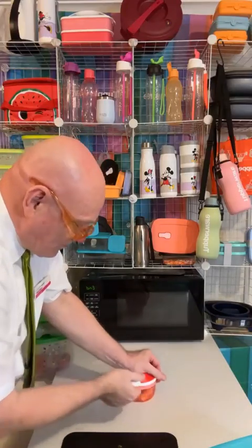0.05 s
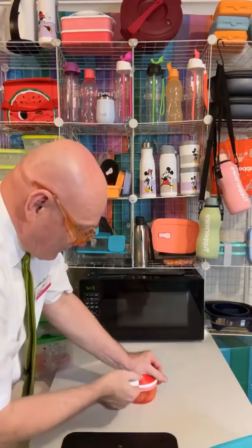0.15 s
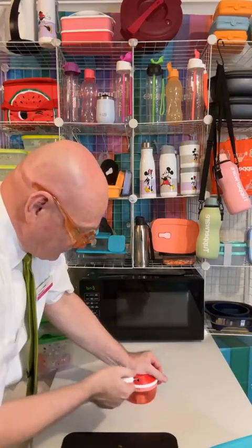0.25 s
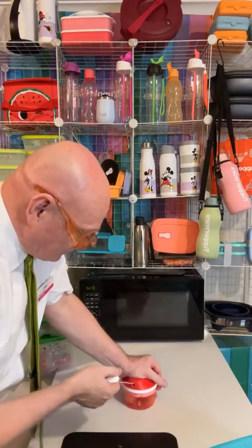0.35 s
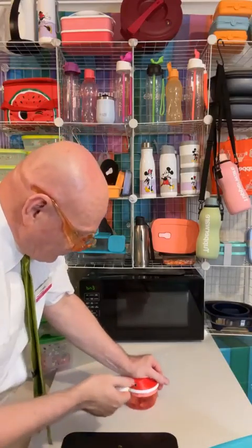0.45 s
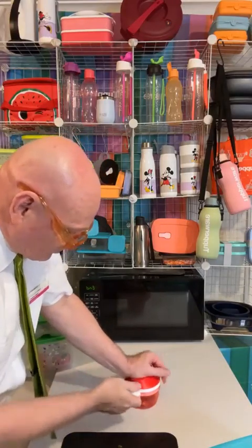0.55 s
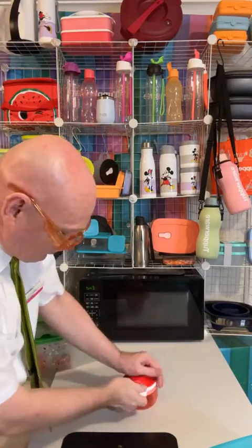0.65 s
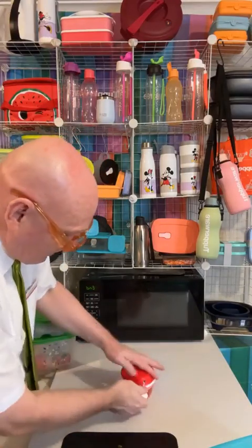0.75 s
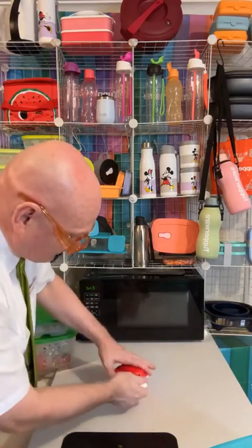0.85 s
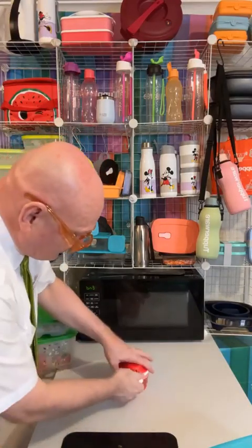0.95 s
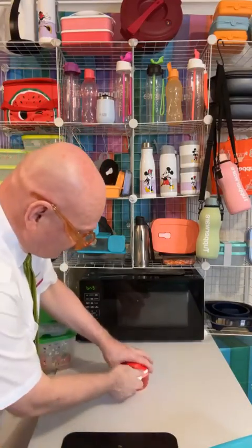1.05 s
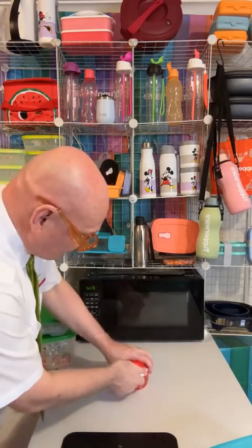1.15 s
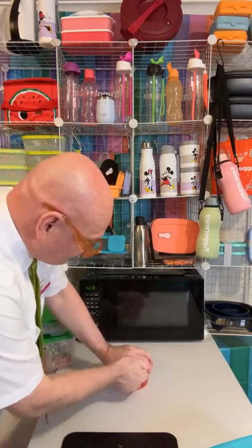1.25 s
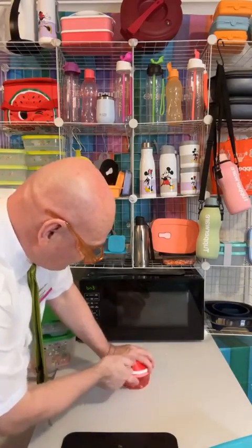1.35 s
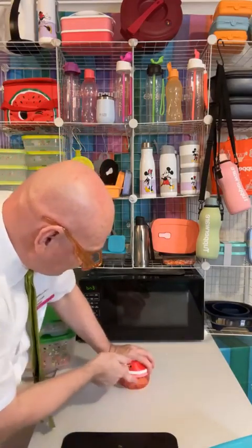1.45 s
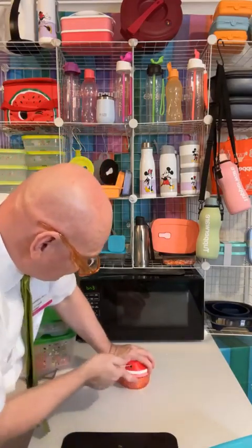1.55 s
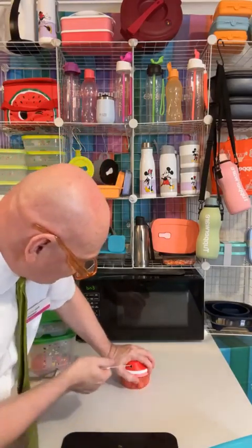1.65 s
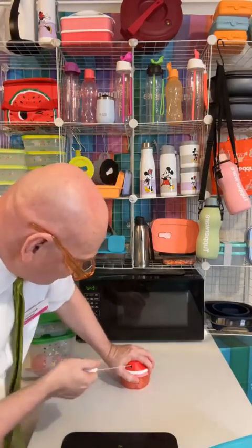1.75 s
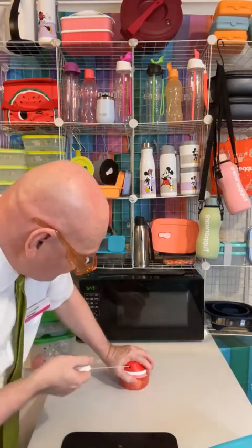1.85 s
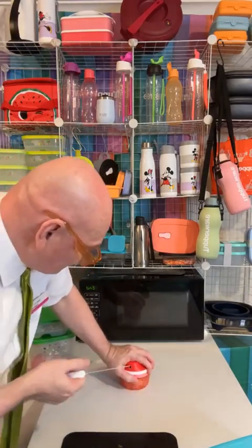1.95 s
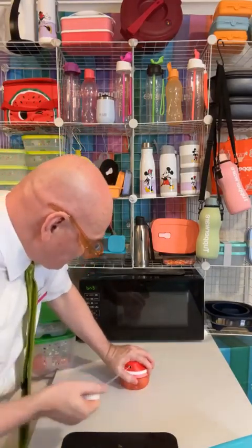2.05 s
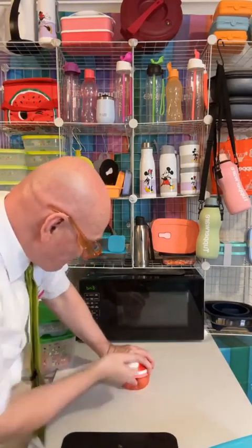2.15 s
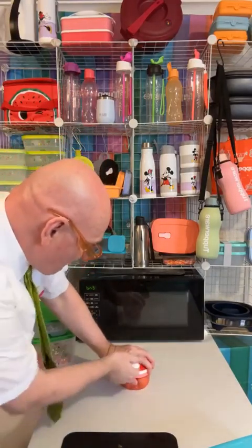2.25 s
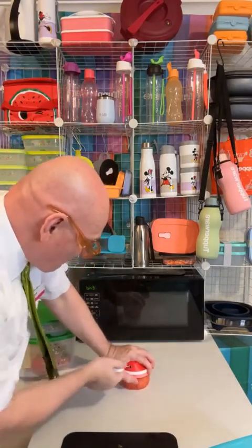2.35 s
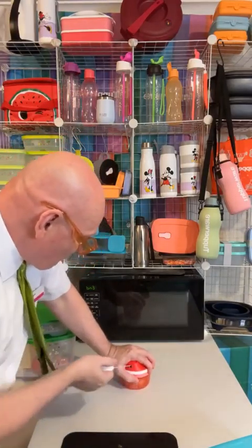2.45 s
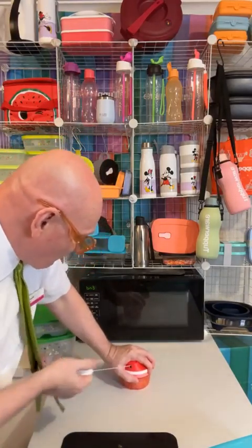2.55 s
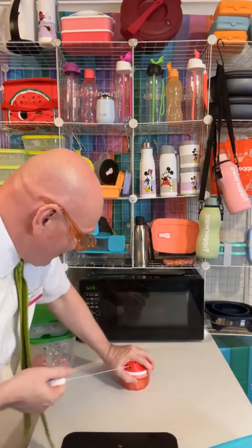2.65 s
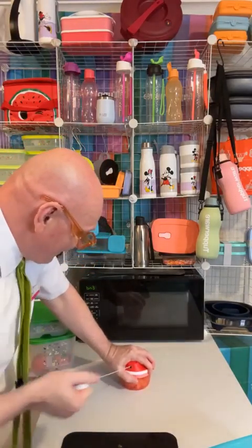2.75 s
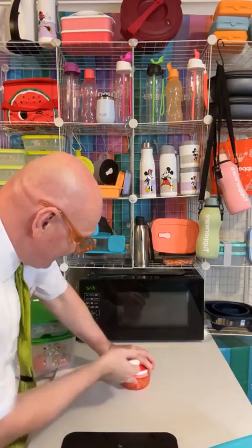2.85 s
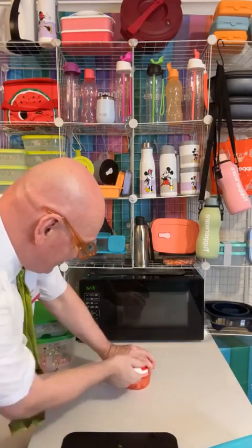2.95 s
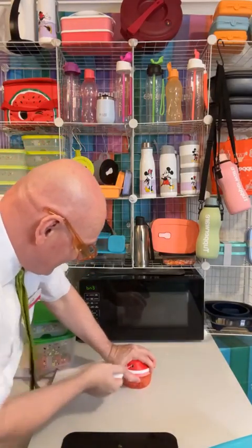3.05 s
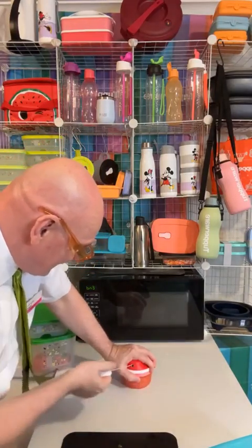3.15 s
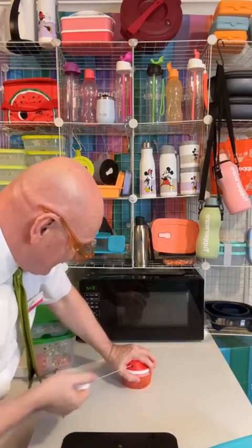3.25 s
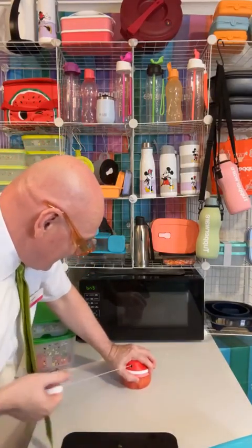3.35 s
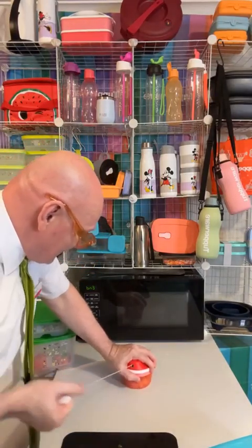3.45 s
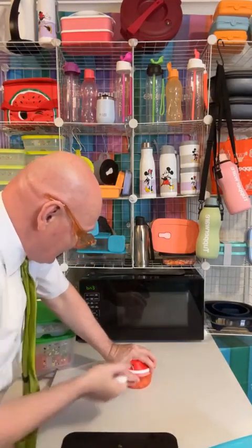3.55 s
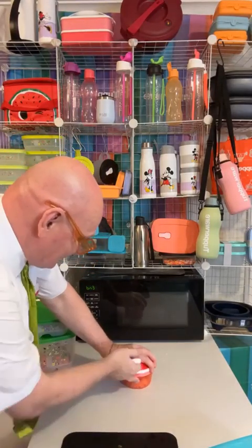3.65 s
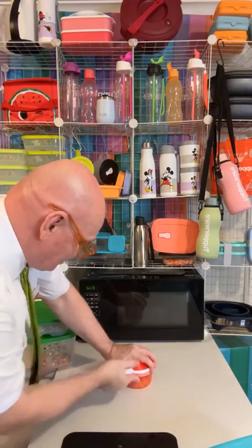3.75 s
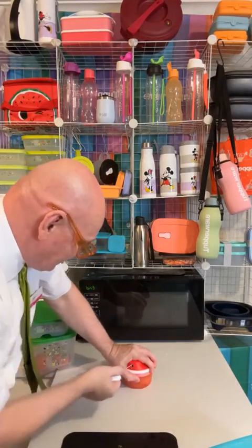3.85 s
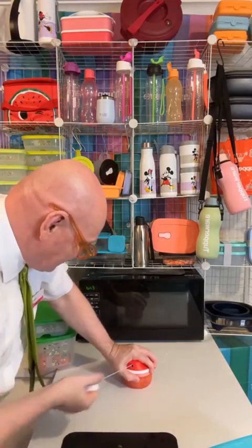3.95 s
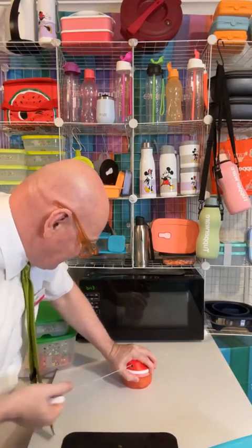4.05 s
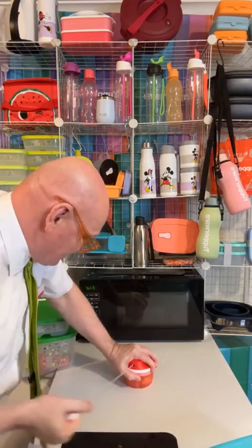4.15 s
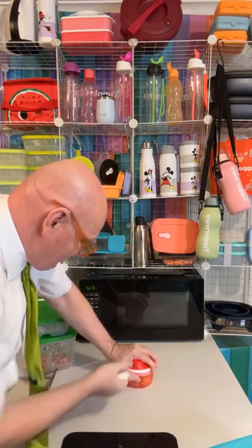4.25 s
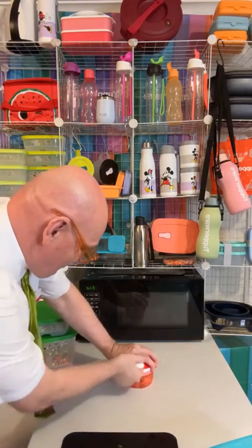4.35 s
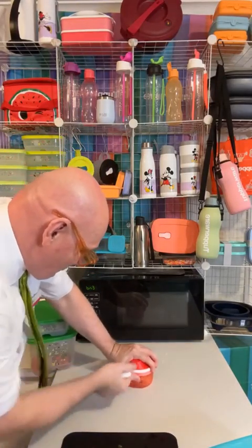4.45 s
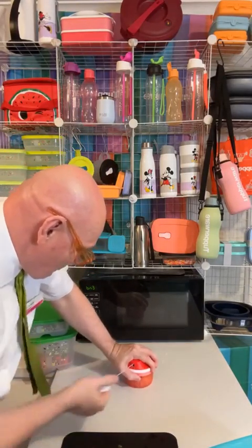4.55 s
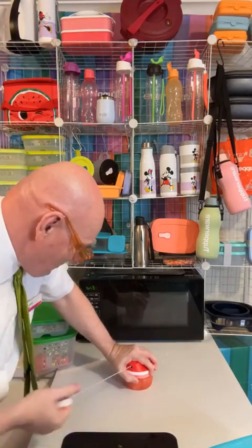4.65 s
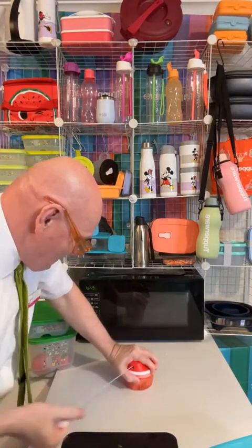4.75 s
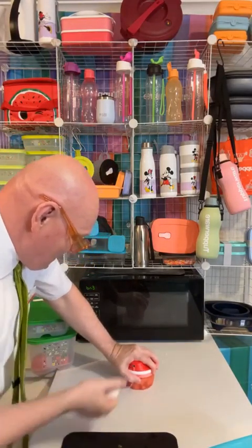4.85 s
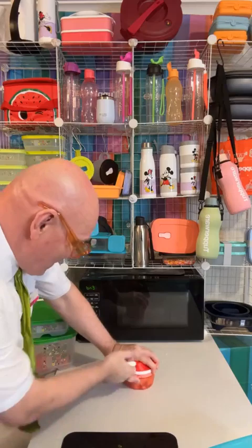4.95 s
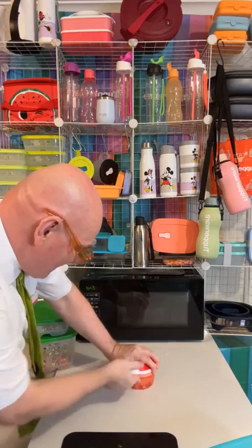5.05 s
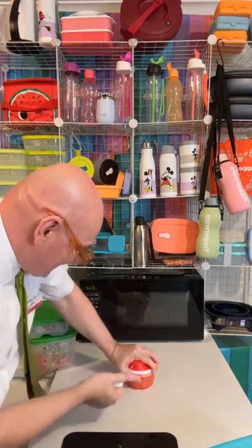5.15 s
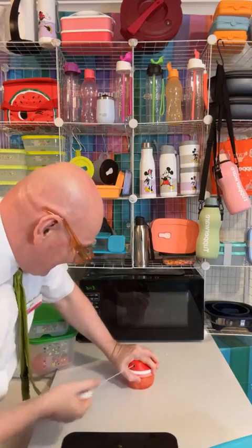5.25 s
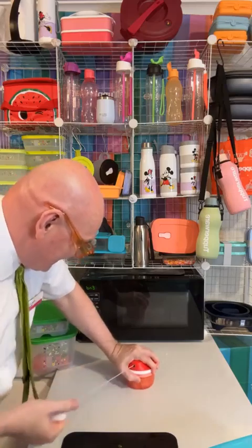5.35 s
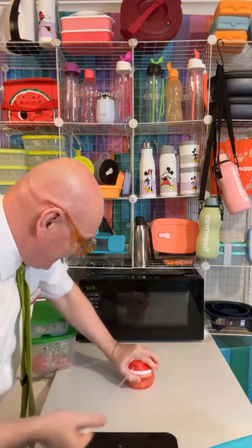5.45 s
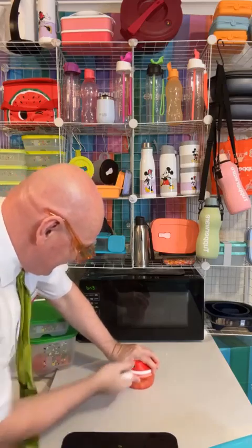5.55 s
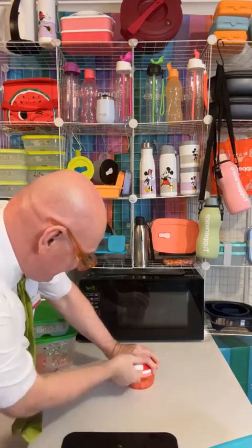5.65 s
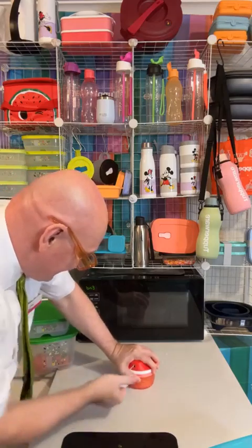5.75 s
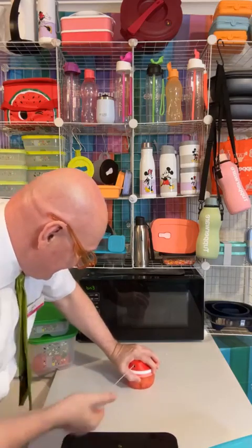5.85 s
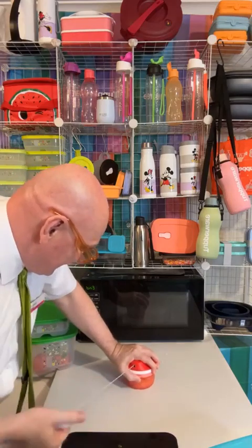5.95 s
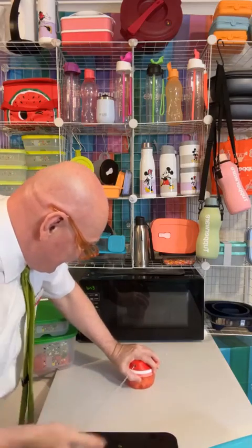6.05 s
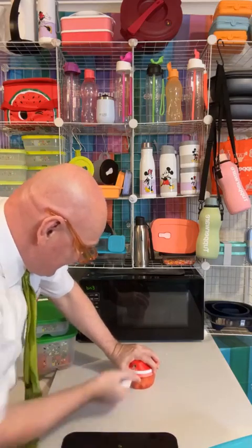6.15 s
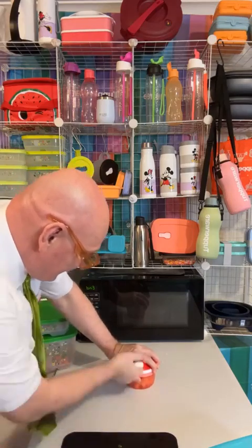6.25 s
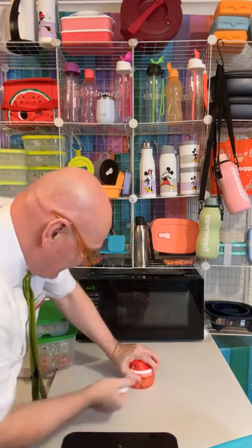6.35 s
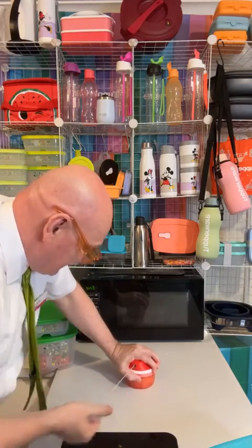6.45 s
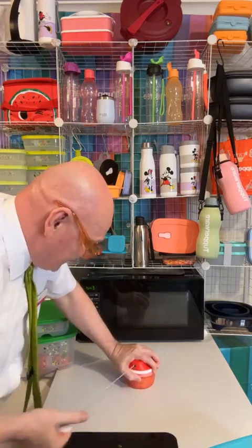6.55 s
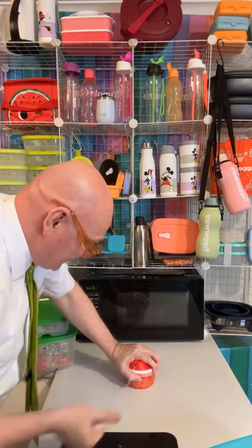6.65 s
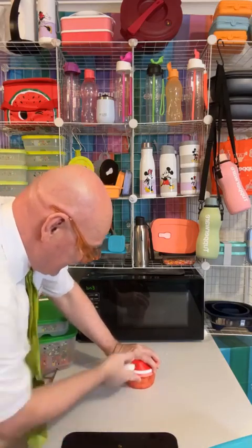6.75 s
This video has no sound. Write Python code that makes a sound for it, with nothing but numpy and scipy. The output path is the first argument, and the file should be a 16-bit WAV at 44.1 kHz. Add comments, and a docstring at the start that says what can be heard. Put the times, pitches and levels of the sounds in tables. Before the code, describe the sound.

In a small, cluttered kitchen, a plastic pull-cord chopper is slid and bumped on the counter with faint rubs and taps. The cord then jams through two short tugs before full pulls begin. Each sends blades clattering through hard pieces with low counter rumble, followed by a bright ratcheting rewind and a click. Fairly close microphone, short room echoes, quiet noise floor.

```python
"""Blades of a pull-cord chopper batter hard food round a plastic bowl: random blows on wall resonances.
Eight pulls, the first jamming into two tugs, rumble the kitchen counter; a low whir follows the blades.
Between pulls a spring winds the cord back: pawl ticks make a bright whirr, and the catch clicks in.
Before that a hand slides and bumps the chopper into place: filtered slips and short noise bursts.
Kitchen echoes surround it all, over a quiet noise floor."""
import sys
import numpy as np
from scipy import signal
from scipy.fft import rfft, irfft
from scipy.io import wavfile
from scipy.ndimage import uniform_filter1d

SR = 44100
rng = np.random.default_rng(int(sys.argv[2]) if len(sys.argv) > 2 else 0)


def store_wav(level_fs):
    """Save 16-bit WAV to argv[1]."""
    pcm = np.round(np.clip(np.atleast_2d(level_fs), -1, 1) * 32767)
    wavfile.write(sys.argv[1], SR, pcm.T.astype(np.int16))


N = 299306
TIME = np.arange(N) / SR

# Drives in the tables are levels ahead of filters and mix gains; spectra are relative.
# spring rewinds: start t/s, catch t/s, speed-up/s, ratchet drive/dB, release drive/dB, catch drive/dB
REWINDS = [(2.368, 2.593, 0.069, -27, -22, -18), (3.078, 3.282, 0.06, -24, -23, -19),
           (3.799, 4.027, 0.081, -25, -46, -17.5), (4.482, 4.691, 0.099, -24, -36, -23),
           (5.119, 5.342, 0.067, -23.5, -27.5, -20), (5.761, 5.976, 0.062, -23.5, -30, -22.5),
           (6.372, 6.586, 0.09, -24.5, -31.5, -20.5)]
# bowl resonances, with dips where the counter's reflection cancels (near 200 and 455 Hz): f/Hz, width/Hz,
# lift/dB
BOWL_MODES = [(200, 26, -11), (262, 93, 14), (384, 61, 5), (455, 31, -3.5), (542, 63, 3), (808, 7.8, 6.5),
              (970, 18, -0.5), (1580, 20, 8), (1506, 74, 4), (2097, 30, 6.5), (3230, 90, -22),
              (3290, 52, 12), (3540, 90, -13), (4440, 640, 7), (5300, 130, 6), (7550, 130, 7)]
# counter-top resonances: f/Hz, width/Hz, lift/dB
COUNTER_MODES = [(81.3, 13.6, 9.5), (114, 9.6, 17.5), (150, 28, 4)]
# resonances of the lid that houses the reel: f/Hz, width/Hz, lift/dB
LID_MODES = [(285, 25, 6.5), (364.7, 17, 8.5), (800, 13, 9.5), (1040, 360, 6), (1497, 100, 5),
             (1727, 76, 6.5), (2200, 81, 7), (2777, 160, 3), (2980, 210, 6.5), (4000, 220, 3),
             (5070, 160, 5), (5360, 44, 1), (7000, 100, 7)]
# counter rumble spectrum: f/Hz, level/dB
RUMBLE_SPECTRUM = [(25, -36), (45, -56), (66, -15), (82, -5), (120, -10), (170, 1.5), (230, -5.5),
                   (400, -5), (1500, -73)]
# spectrum of cord hiss, food cracks and lid ticks: f/Hz, level/dB
HISS_SPECTRUM = [(1500, -33.5), (3500, 13.5), (5000, 4.5), (7000, -3.5), (9000, -8), (13000, -19),
                 (16000, -9)]
# treble spectrum of rewinding cord and contact snaps: f/Hz, level/dB
ZIP_SPECTRUM = [(3000, -29), (6000, 6), (7500, 3.5), (9500, -3), (11500, 1), (14000, -1), (16000, -6.5)]


def chopping(idle_hz=85, top_hz=155, coast_s=.12):
    """Spinning blades fling pieces at the bowl wall; the blows shake the counter while the cord runs out."""
    # chopping spectrum: f/Hz, level/dB
    chop_spectrum = [(120, -25), (250, -15), (450, -3.5), (700, -1), (1000, 3), (1500, -3), (2500, -7),
                     (4500, -16), (6000, -19.5), (9000, -30.5), (16000, -31)]
    chop, rumble = pull_gains()
    blows = contacts(per_s=170, spread_db=0.0)

    clatter = even(crunch(blows, crush_s=.0018, bed=.35), window_s=.028)
    bowl = colour(chop * clatter, chop_spectrum, BOWL_MODES)

    small_blows = contacts(per_s=740, spread_db=2)
    patter = chop * even(pieces(blows + 0.24 * small_blows, q=9.8), window_s=0.022)

    shaking = colour(crunch(blows, crush_s=0.0025, bed=0.15), RUMBLE_SPECTRUM, COUNTER_MODES)
    counter = rumble * even(shaking, window_s=0.19)

    friction = even(crunch(blows, crush_s=0.0024, bed=0.85), window_s=.04)
    cord = colour(chop ** 0.95 * friction, HISS_SPECTRUM)

    # the rotor speeds up with the pull and coasts down: a low, unsteady whir
    momentum = np.sqrt(leak(chop, coast_s))
    speed = momentum / momentum.max()
    pass_hz = idle_hz + (top_hz - idle_hz) * speed + 12 * drift(per_s=60)
    tone = np.sin(2 * np.pi * np.cumsum(pass_hz) / SR)
    whir = rumble * speed * tone * from_db(5.6 * drift(per_s=31))

    return (bowl + from_db(-8) * patter + from_db(-4.5) * counter
            + from_db(-23.0) * cord + from_db(-9.5) * whir)


def pull_gains():
    """Each pull speeds the blades up and lets them run down: gains of chopping and counter rumble."""
    # cord pulls: start t/s, speed-up/s, run-down/s,
    # first-bite chop drive/dB, full-speed chop drive/dB, counter rumble drive/dB
    pulls = [(1.815, 0.039, 0.47, -38.5, -33.5, -33), (2.171, 0.071, 0.122, -45, -35, -37),
             (2.678, 0.21, 0.16, -36.5, -23, -32), (3.34, 0.23, 0.19, -36, -26, -32),
             (4.086, 0.26, 0.11, -35.5, -23, -34), (4.739, 0.084, 0.27, -35.5, -22.5, -33.5),
             (5.395, 0.1057, 0.23, -34, -23, -35), (6.03, 0.12, 0.21, -29, -22, -37.5),
             (6.633, 0.11, 0.27, -28, -23, -36)]
    bends = (1.1, 1.4)
    chop, rumble = 0, 0
    for start_s, rise_s, fall_s, bite_db, top_db, rumble_db in pulls:
        chop_swell = swell(start_s, rise_s, fall_s, rise_db=top_db - bite_db, fall_db=22,
                           bends=bends, fade_s=0.0159)
        # the rumble swings less than the chopping
        rumble_swell = swell(start_s, rise_s, fall_s, rise_db=3, fall_db=19,
                             bends=bends, fade_s=0.0069)
        chop = chop + from_db(top_db) * chop_swell
        rumble = rumble + from_db(rumble_db) * rumble_swell
    return chop, rumble


def knocks():
    """Blades strike big pieces: blows ring the bowl, each at its own pitch, thump the counter, crack food."""
    # big-piece blows: t/s, force drive/dB, ring f/Hz, crack drive/dB
    strikes = [(1.886, -22, 1165, -54), (1.945, -24.5, 1040, -49), (1.975, -20, 920, -32),
               (1.979, -5.5, 1410, -23), (2.142, -23, 714, -44), (2.187, -15.5, 970, -35),
               (2.231, -11, 1086, -35), (2.267, -19, 800, -52), (2.678, -13.5, 1540, -30),
               (2.825, -9, 1220, -25), (2.905, -9, 1180, -31), (2.968, -18, 1040, -32),
               (3.339, -17, 854, -39), (3.369, -15.5, 1110, -36), (3.389, -26, 527, -38.5),
               (3.463, -16, 980, -33), (3.516, -10.5, 1100, -39), (3.538, -10.5, 1070, -31),
               (3.582, -11, 910, -31), (3.607, -16, 1073, -45), (4.217, -29, 1040, -36.5),
               (4.25, -12, 742, -27.5), (4.286, -10, 1000, -32), (4.329, -12, 776, -38),
               (4.415, -17, 1630, -33), (4.762, -20, 840, -39), (4.826, -13.5, 1560, -32),
               (4.877, -9.5, 1023, -36.5), (4.928, -14, 1200, -29.5), (4.997, -15.5, 974, -35.5),
               (5.054, -23, 831, -45.5), (5.473, -7, 490, -27), (5.513, -25, 956, -30.5),
               (5.551, -10.5, 940, -55), (5.605, -15.5, 810, -33), (6.172, -28, 824, -38),
               (6.231, -9.5, 950, -29.5), (6.643, -15.5, 848, -27.5), (6.747, -11.5, 1040, -29)]
    # blow spectrum: f/Hz, level/dB
    knock_spectrum = [(100, -24.5), (300, -7.5), (600, -2.5), (900, 2.5), (1500, -4.5), (2500, -5.5),
                      (4500, -22.5), (8000, -22.5), (16000, -34.5)]
    s, force_db, ring_hz, crack_db = np.transpose(strikes)
    force = bursts(force_db, rise_s=0.0034, decay_s=0.0043)
    blows = pitched(force, ring_hz, ring=.8, q=3)
    cracks = bursts(crack_db, rise_s=0.0017, decay_s=0.002)
    return (from_db(-5.5) * colour(place(s, blows), knock_spectrum, BOWL_MODES)
            + from_db(-20) * colour(place(s, force), RUMBLE_SPECTRUM, COUNTER_MODES)
            + from_db(6.5) * colour(place(s, cracks), HISS_SPECTRUM))


def rewinding(top_ticks_per_s=330, jitter=.35):
    """The spring spins the reel back: pawl ticks quicken as the whirr swells; the cord zips through its eye."""
    # ratchet spectrum: f/Hz, level/dB
    ratchet_spectrum = [(100, -12), (200, -9), (400, -4.5), (1000, -3.5), (1500, -0.5), (2000, -4),
                        (3000, -1.5), (5000, -6), (6500, -10), (10000, -37)]
    ratchet, hiss = rewind_gains()
    speed = np.sqrt(ratchet / ratchet.max())
    wobble = 1 + jitter * drift(per_s=250)
    teeth = np.cumsum(top_ticks_per_s * speed * wobble) / SR
    # a tick at each whole tooth, of uneven strength
    ticks = np.diff(np.floor(teeth), prepend=0) * from_db(1.2 * rng.standard_normal(N))
    force = even(crunch(ticks, crush_s=0.0014, bed=1.0), window_s=0.015)
    force = force * from_db(1.5 * drift(per_s=130))
    # the loose reel also rattles against its housing
    rattle = even(pieces(ticks, q=8.4), window_s=0.0273)
    return (from_db(0.5) * colour(ratchet * force, ratchet_spectrum, LID_MODES)
            + from_db(-8.0) * ratchet * rattle
            + from_db(4.5) * colour(hiss * force, ZIP_SPECTRUM))


def rewind_gains():
    """The reel speeds up, then slows as the handle comes home: gains of ratchet and cord hiss."""
    ratchet = 0
    for start_s, catch_s, rise_s, ratchet_db, _, _ in REWINDS:
        stroke = swell(start_s, rise_s, catch_s - start_s - rise_s, rise_db=12, fall_db=22,
                       bends=(1.3, 1.25), fade_s=.005)
        ratchet = ratchet + from_db(ratchet_db) * stroke
    # the hiss swings wider than the ratchet
    hiss = from_db(-34.5) * (ratchet / ratchet.max()) ** 1.45
    return ratchet, hiss


def clicks():
    """Small plastic parts snap together: handle on lid, spring release, catch; brighter than bowl blows."""
    # handle taps on the lid: t/s, click drive/dB, snap drive/dB
    taps = [(0.007, -24, -44), (0.04, -33, -44), (0.488, -40, -45.5), (0.797, -27.5, -49),
            (0.851, -29.5, -42), (1.014, -37, -50), (1.567, -18.5, -38), (1.843, -36, -36),
            (3.117, -18.5, -31), (3.906, -20, -23), (5.959, -33, -26), (6.4, -23.5, -30.5)]
    # click spectrum: f/Hz, level/dB
    click_spectrum = [(100, -8), (400, -2), (900, 0), (1600, 1), (3000, -1.5), (5000, -2.5), (8000, -21.5),
                      (16000, -24)]
    snap_offset_db = -16.5  # snap drive relative to click drive, for release and catch
    releases = [(s, db, db + snap_offset_db) for s, _, _, _, db, _ in REWINDS]
    catches = [(s, db, db + snap_offset_db) for _, s, _, _, _, db in REWINDS]
    s, click_db, snap_db = np.transpose(taps + releases + catches)
    # the lid rings, and the hard edge of the contact adds a treble snap
    body = bursts(click_db, rise_s=.0018, decay_s=0.0041)
    snap = bursts(snap_db, rise_s=0.0013, decay_s=0.0028)
    return (from_db(-3.0) * colour(place(s, body), click_spectrum, LID_MODES)
            + from_db(0.5) * colour(place(s, snap), ZIP_SPECTRUM))


def handling():
    """A hand slides the chopper into place: fingers and base move in small slips."""
    # slides: start t/s, build-up/s, fade/s, rub drive/dB, hiss drive/dB
    slides = [(0.0, 0.01, 0.089, -46, -46), (0.24, 0.1, 0.38, -49.5, -55.5), (0.44, 0.049, 0.28, -39, -51),
              (0.73, 0.087, 0.18, -42.5, -44), (1.13, 0.02, 0.14, -44.5, -47),
              (1.6, 0.27, 0.59, -41.5, -51)]
    # rub spectrum: f/Hz, level/dB
    rub_spectrum = [(100, -35), (250, -7.5), (500, -1.5), (900, 0), (1600, -4.5), (3000, -9.5),
                    (8000, -46.5)]
    # sliding hiss spectrum: f/Hz, level/dB
    slide_spectrum = [(700, -27), (1600, -1.5), (2700, -0.5), (4000, -5), (5800, -10), (8000, -21),
                      (16000, -23)]
    # fingers rub faintly until just before the first pull
    grip = np.clip((1.79 - TIME) / 0.058, 0, 1)
    rub, hiss = from_db(-54.5) * grip, from_db(-61) * grip
    for start_s, rise_s, fall_s, rub_db, hiss_db in slides:
        push = swell(start_s, rise_s, fall_s, rise_db=15, fall_db=21, bends=(1.0, 1), fade_s=0.017)
        rub = rub + from_db(rub_db) * push
        hiss = hiss + from_db(hiss_db) * push
    slips = even(crunch(contacts(per_s=180, spread_db=8), crush_s=0.0025, bed=0.31), window_s=0.032)
    creaks = even(pieces(contacts(per_s=300, spread_db=-2), q=5.3), window_s=0.065)
    rumble = even(colour(rng.standard_normal(N), RUMBLE_SPECTRUM, COUNTER_MODES), window_s=0.037)
    return (from_db(-2.5) * colour(rub * (slips + 0.28 * creaks), rub_spectrum, BOWL_MODES)
            + from_db(2.0) * colour(hiss * slips, slide_spectrum, LID_MODES)
            + from_db(-16.5) * rub * rumble)


def bumps():
    """The base meets the counter with a dull knock and a thud; the loose lid ticks."""
    # base on counter: t/s, force drive/dB, ring f/Hz, thud drive/dB
    contacts_made = [(0.173, -34.5, 536, -61), (0.221, -27, 614, -54), (0.228, -22, 795, -51),
                     (0.348, -39, 248, -47), (0.511, -27.5, 820, -42.5), (0.53, -26.5, 394, -48),
                     (0.554, -30, 250, -50), (0.948, -30, 417, -47), (1.127, -21.5, 545, -38),
                     (1.15, -19.5, 567, -37.5), (1.432, -39.5, 346, -61), (1.736, -38, 285, -49)]
    # knock spectrum of the base: f/Hz, level/dB
    bump_spectrum = [(100, -14), (250, -10), (500, -3), (800, 0), (1500, -8), (3000, -15), (5500, -21),
                     (8000, -37)]
    s, force_db, ring_hz, thud_db = np.transpose(contacts_made)
    force = bursts(force_db, rise_s=0.0013, decay_s=0.0049)
    blows = pitched(force, ring_hz, ring=1.6, q=6)
    thuds = bursts(thud_db, rise_s=0.0032, decay_s=0.0092)
    return (from_db(-3) * colour(place(s, blows), bump_spectrum, BOWL_MODES)
            + from_db(10.5) * colour(place(s, thuds), RUMBLE_SPECTRUM, COUNTER_MODES)
            + from_db(-14.5) * colour(place(s, force), HISS_SPECTRUM))


def kitchen(x, near_db, near_s, tail_db, tail_onset_s):
    """Counter and shelves answer at once; a diffuse tail follows, longest in the bass."""
    # reverberation: f/Hz, t60/s
    decay_times = [(80, 0.4), (210, 0.21), (560, 0.13), (1500, 0.12), (4000, 0.14), (12000, 0.14)]
    age = TIME[:SR]
    sparse = rng.standard_normal(SR) * (rng.random(SR) < .05)
    near = rms_one(sparse * np.exp(-age / near_s) * (age > .001))

    white, hz, tail = rfft(rng.standard_normal(SR)), np.fft.rfftfreq(SR, 1 / SR), 0
    for low in 22 * 2 ** np.arange(10):  # octave bands
        band = irfft(white * ((hz >= low) & (hz < 2 * low)), SR)
        tail = tail + band * from_db(-60 * age / at_hz(decay_times, low * np.sqrt(2)))
    tail = rms_one(tail * np.minimum(age / tail_onset_s, 1))
    response = (age == 0) + (from_db(near_db) * near + from_db(tail_db) * tail) / np.sqrt(SR)

    # echoes comb the spectrum finely, but the cluttered room favours no broad band
    power = np.abs(rfft(response)) ** 2
    ragged = np.interp(hz, [1500, 4000, 9000], [0, .8, .15])
    # bins are 1 Hz apart
    broad = (1 - ragged) * uniform_filter1d(power, size=28) + ragged * uniform_filter1d(power, size=400)
    return signal.fftconvolve(x, causal(response, 1 / np.sqrt(broad)))[:N]


def background():
    """Quiet steady floor: coloured noise."""
    # floor spectrum: f/Hz, level/dB
    floor_spectrum = [(25, -65), (85, 18), (200, 3), (600, -5), (2000, -3), (5000, -7), (8000, -24),
                      (16000, -28)]
    return from_db(-58) * colour(rng.standard_normal(N), floor_spectrum)


def swell(start_s, rise_s, fall_s, rise_db, fall_db, bends, fade_s):
    """Gain of one stroke: climbs rise_db to one, sinks fall_db; bends shape both (1 = straight in dB)."""
    past_top = TIME - start_s - rise_s
    # short linear fades just outside the stroke
    gain = np.clip(1 + np.minimum(TIME - start_s, fall_s - past_top) / fade_s, 0, 1)
    on = gain > 0
    rising = np.clip(-past_top[on] / rise_s, 0, 1)
    falling = np.clip(past_top[on] / fall_s, 0, 1)
    gain[on] *= from_db(-rise_db * rising ** bends[0] - fall_db * falling ** bends[1])
    return gain


def contacts(per_s, spread_db):
    """Random touches at a mean rate; spread_db scales how uneven their strengths are."""
    return (rng.random(N) < per_s / SR) * from_db(spread_db * np.minimum(rng.exponential(1, N), 3))


def crunch(touches, crush_s, bed):
    """Each contact crumbles into a brief noise burst, over a bed of steady friction."""
    power = leak(touches ** 2 + 1e-18, crush_s)
    return rng.standard_normal(N) * np.sqrt(power / power.mean() + bed ** 2)


def pieces(blows, q, count=12):
    """Deal the blows at random to resonances spaced evenly in log frequency."""
    dealt = rng.integers(0, count, N)
    pitches_hz = np.geomspace(330, 2600, count)
    return sum(resonate(blows * (dealt == k), hz, q) for k, hz in enumerate(pitches_hz))


def bursts(levels_db, rise_s, decay_s, size=4096):
    """One short noise burst of force per row: it builds as the parts meet, then dies."""
    age = np.arange(size) / SR
    shape = (1 - np.exp(-(age / rise_s) ** 2)) * np.exp(-age / decay_s)
    noise = rng.standard_normal((len(levels_db), size))
    return from_db(levels_db)[:, None] * noise * shape / shape.max()


def pitched(blows, ring_hz, ring, q):
    """Each blow rings briefly around its own pitch."""
    return [blow + ring * resonate(blow, hz, q) for blow, hz in zip(blows, ring_hz)]


def place(times, sounds):
    """Lay short sounds out in time."""
    out = np.zeros(N + SR)
    for s, sound in zip(times, sounds):
        start = int(np.clip(s * SR, 0, N))
        out[start:start + len(sound)] += sound
    return out[:N]


def drift(per_s):
    """Smooth random wander about zero, of spread about one."""
    knots = rng.standard_normal(4096)
    return 1.2 * np.interp(TIME * per_s, np.arange(len(knots)), knots)


def leak(x, decay_s):
    """Running sum that leaks away exponentially."""
    return signal.lfilter([1], [1, -np.exp(-1 / (decay_s * SR))], x)


def even(x, window_s):
    """Hold the short-term level near one, keeping the grain inside the window."""
    return x / np.sqrt(np.maximum(uniform_filter1d(x * x, int(window_s * SR)), 1e-12))


def resonate(x, hz, q):
    """One resonance, gain 1 on top."""
    return signal.lfilter(*signal.iirpeak(hz, max(q, .7), fs=SR), x + 1e-18)


def colour(x, spectrum, modes=(), size=8192):
    """Filter of unit power with a broad spectrum and resonances on top."""
    hz = np.fft.rfftfreq(size, 1 / SR)
    lifts = sum(lift / (1 + (2 * (hz - f) / width) ** 2) for f, width, lift in modes)
    return causal(x, rms_one(from_db(at_hz(spectrum, hz) + lifts)))


def causal(x, gain):
    """Minimum-phase filter with these gains from 0 Hz to half the sampling rate: nothing sounds early."""
    size = 2 * (len(gain) - 1)
    cepstrum = irfft(np.log(gain))[:size // 2]
    cepstrum[1:] *= 2
    return signal.oaconvolve(x, irfft(np.exp(rfft(cepstrum, size)))[:size // 2])[:len(x)]


def at_hz(points, hz):
    """Read a table on a log-frequency axis."""
    points = np.array(points)
    return np.interp(np.log(np.maximum(hz, 1)), np.log(points[:, 0]), points[:, 1])


def from_db(db):
    """Amplitude ratio of a level in dB."""
    return 10 ** (np.asarray(db) / 20)


def rms_one(x):
    """Scale to an RMS of one."""
    return x / np.sqrt(np.mean(x ** 2) + 1e-20)


def scene():
    """The chopper in its kitchen, over a quiet background."""
    chopper = chopping() + knocks() + rewinding() + clicks() + handling() + bumps()
    room = kitchen(chopper, near_db=-1.5, near_s=0.014, tail_db=-0.5, tail_onset_s=0.012)
    return (room + background())[None]


def record(dry):
    """The small microphone loses the deep bass; the top is cut steeply."""
    bass_cut = signal.butter(2, 45, "high", fs=SR, output="sos")
    top_cut = signal.ellip(12, .1, 80, 16000, fs=SR, output="sos")
    return signal.sosfilt(top_cut, signal.sosfilt(bass_cut, dry))


dry = scene()
out = record(dry)
store_wav(out)
```